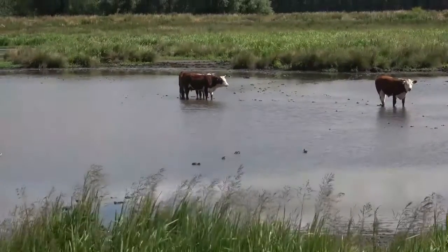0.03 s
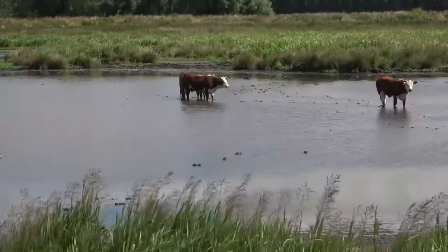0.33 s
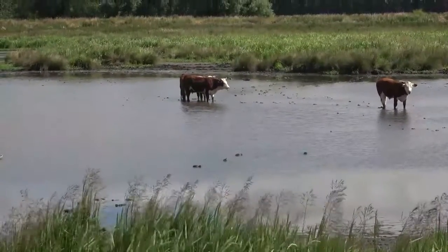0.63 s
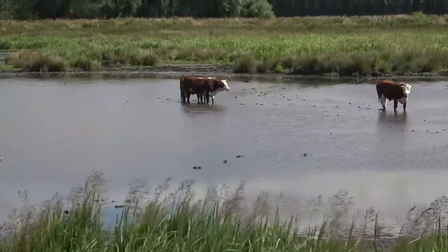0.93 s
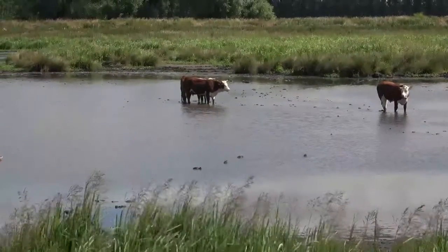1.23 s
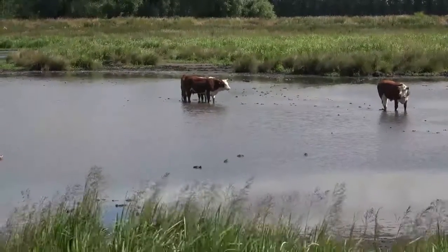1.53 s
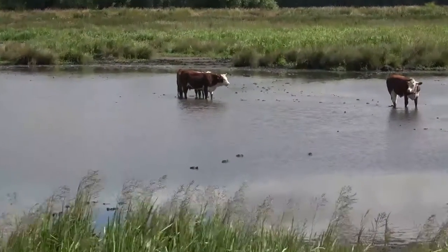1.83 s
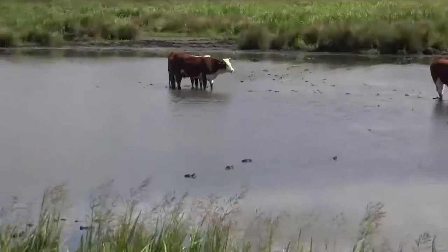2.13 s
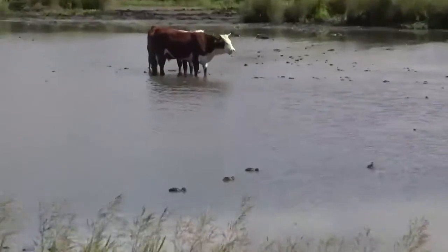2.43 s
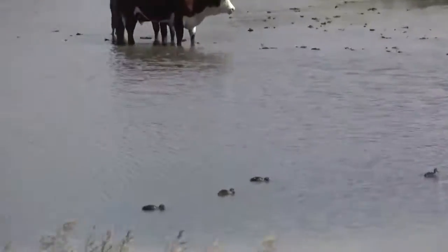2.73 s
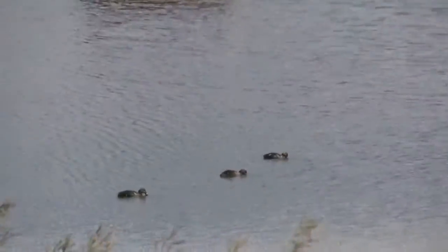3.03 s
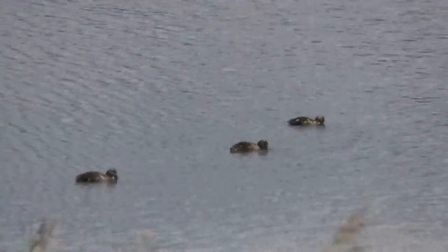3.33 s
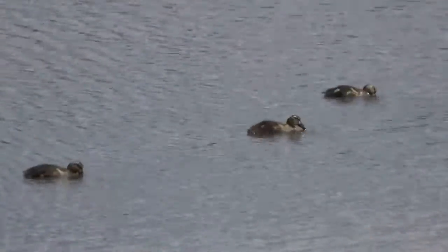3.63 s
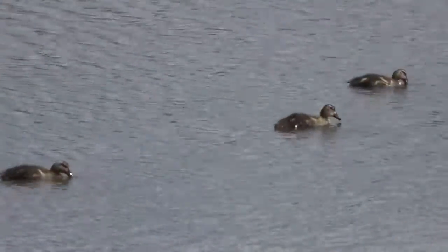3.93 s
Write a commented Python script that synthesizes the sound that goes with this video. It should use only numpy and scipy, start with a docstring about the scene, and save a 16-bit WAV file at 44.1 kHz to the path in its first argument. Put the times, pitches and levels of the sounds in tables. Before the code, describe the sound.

A wading bird starts yelping almost at once, about six high, cracking calls a second, over wind rumbling on the microphone and softly hissing reeds. The calls swell from 0.6 seconds, among faint thin whistles and two distant quacks. Dry wind crackles begin around 1.3 seconds, and gusts hit hardest from 2 seconds. The yelps fade near 3 seconds, pause, and return faintly at about 3.7 seconds.

```python
"""Wind buffets the microphone from the start, and reeds hiss beside a shallow pond. Almost at once a
wading bird begins to yelp, about six times a second: each harmonic call dips, breaks upward and falls
away. The series swells among thin gliding whistles and far-off quacks; then come short dry ticks, many
of them wind crackling on the microphone. From two seconds on the strongest gusts drive its limiter.
The yelps fade near three seconds, pause, and return faintly at the end."""
import sys
import numpy as np
from scipy import signal
from scipy.fft import rfft, irfft, next_fast_len
from scipy.io import wavfile
from scipy.ndimage import uniform_filter1d, minimum_filter1d, map_coordinates

SR = 44100
rng = np.random.default_rng(int(sys.argv[2]) if len(sys.argv) > 2 else 0)


def unload_audio(sound):
    """Save the sound as a 16-bit wav file, at the path given as the first command line argument."""
    columns = np.transpose(np.atleast_2d(sound))
    # keep every value between -1 and 1, then stretch to whole-number steps
    steps = np.round(np.clip(columns, -1, 1) * 32767)
    wavfile.write(sys.argv[1], SR, steps.astype(np.int16))


N = 176400

# Spectra of the microphone's hiss, grass, reeds, wind rumble and eddies: frequency_hz, relative_db
HISS_SPECTRUM = [(7000, -54), (11000, -13), (12700, 2), (14400, -12), (15400, 7), (16000, -13)]
GRASS_SPECTRUM = [(200, -18), (350, -2.5), (550, -3.5), (950, -8.5), (1300, -23.5), (2200, -12),
                  (5000, -38)]
REED_SPECTRUM = [(300, 9), (600, -5), (950, 5), (1220, 4), (1600, 10.5), (1900, -2), (2800, -1), (3500, 1),
                 (4200, 2), (4900, -5.5), (5800, -1.5), (6700, -6.5), (8000, -0.5), (9500, -3), (12000, -4),
                 (16000, -11)]
RUMBLE_SPECTRUM = [(4, -58), (9, -13.5), (16, 6.5), (25, -1.5), (40, -5), (63, -14), (100, -23.5),
                   (160, -34.5), (300, -52), (700, -90)]
EDDY_SPECTRUM = [(50, -0.5), (110, -5.5), (170, -0.5), (250, -5.5), (400, -14), (630, -24.5), (1200, -30.5),
                 (3000, -46)]
# Envelope of the wind in the grass: time_s, level_db
GRASS_LEVELS = [(0, -56.5), (.5, -58.5), (.9, -55), (1.3, -56), (1.8, -55), (2.3, -57), (2.8, -58.5),
                (4, -59.5)]
# Envelopes of the reed hiss, wind rumble and eddies: time_s, relative_db
REED_LEVELS = [(0.03, -60.5), (0.92, -60.5), (1.44, -63.5), (1.86, -61), (2.4, -67.5), (2.77, -64.5),
               (2.92, -66), (3.97, -66)]
RUMBLE_LEVELS = [(0, -14), (.2, -24), (.3, -16), (.68, -16.5), (.78, -15.5), (1.14, -15), (1.2, -11.5),
                 (1.31, -13.5), (1.43, -10.5), (1.55, -15), (1.85, -13), (2.08, -8), (2.22, -11.5),
                 (2.4, -10.5), (2.48, -13), (2.56, -9), (2.62, -17.5), (2.75, -12.5), (2.92, -18),
                 (3.23, -8.5), (3.28, -12.5), (3.33, -7.5), (3.39, -29), (3.62, -13), (3.78, -20.5),
                 (3.9, -14)]
EDDY_LEVELS = [(0, -39.5), (.2, -44.5), (.42, -35), (1.3, -40.5), (1.41, -42), (1.58, -37), (1.7, -40.5),
               (1.8, -36.5), (2.08, -33), (2.46, -39), (2.84, -36), (2.93, -46.5), (3, -32), (3.05, -43),
               (3.24, -32), (3.38, -42), (3.55, -38.5), (3.59, -37), (3.78, -47.5), (3.89, -38), (4, -38.5)]
# Pressure pulses on the microphone: peak_s, peak_db
BUFFETS = [(1.008, -12.5), (1.29, -26), (1.436, -16.5), (2.005, -17.5), (2.045, -22), (2.232, -17),
           (3.242, -13.5), (3.312, -19), (3.328, -14.5), (3.596, -21.5)]
# Short dry ticks near 1 kHz: start_s, level_db, pitch_hz
TICKS = [(1.289, -38.5, 885), (1.379, -37.5, 794), (1.419, -40.5, 1100), (1.577, -45, 890),
         (2.017, -40, 1060), (2.093, -38, 870), (2.231, -41, 980), (2.34, -42, 980), (2.426, -42.5, 1060),
         (2.449, -40.5, 1190), (2.485, -42, 840), (2.762, -41, 950), (3.597, -45, 1200)]
# Partials of a tick: frequency_ratio, relative_db
TICK_PARTIALS = [(.7, 3), (1, 3), (1.35, 0)]
# Thin whistles, one a falling overtone within a yelp: start_s, length_s, start_hz, end_hz, level_db
WHISTLES = [(.168, 0.037, 1045, 770, -52), (.418, 0.036, 2130, 2780, -58), (0.882, 0.031, 950, 1055, -51),
            (1.333, 0.036, 3200, 2910, -49.5), (1.745, 0.053, 895, 774, -55),
            (2.555, 0.11, 4280, 4100, -61), (2.597, 0.2, 3850, 3640, -63)]
# Duck calls: start_s, length_s, pitch_hz, level_db
QUACKS = [(0.636, 0.139, 526, -61.5), (1.733, 0.069, 468, -64)]
# Harmonics of a quack and a squeak, fundamental first: relative_db
QUACK_HARMONICS = [-17, 4.5, -4, 1, 2.5, -10, -15, -6]
SQUEAK_HARMONICS = [0, -6.5, -7]
# The wader's low notes: start_s, lowest_hz, curvature, harmonic_1_db ... harmonic_4_db
LOW_NOTES = [(0.275, 1403, 0.45, -53, -70, -76.5, -75.0), (0.432, 1360, 0.12, -51.5, -58, -64.5, -71.5),
             (0.601, 1377, 0.56, -43.5, -47.5, -54, -58), (0.768, 1360, 0.33, -47, -50.5, -53.5, -55),
             (0.939, 1337, 0.58, -45.5, -46.5, -54, -55), (1.107, 1252, 0.73, -48.5, -48.5, -54.5, -59),
             (1.266, 1229, 0.89, -47.5, -52, -59, -55), (1.437, 1291, 0.3, -47.5, -53, -57, -58.5),
             (1.619, 1307, 0.62, -47, -51.5, -53, -53.5), (1.798, 1352, 0.31, -45, -53.5, -61, -62),
             (1.964, 1328, 0.52, -45.5, -54.5, -62, -57.5), (2.138, 1376, 0.21, -48.5, -56.5, -57, -54),
             (2.302, 1347, 0.27, -49, -60, -64, -62), (2.485, 1353, 0.21, -54.5, -58.0, -64, -62),
             (2.654, 1350, 0.73, -46, -52.5, -57, -58), (2.821, 1320, 0.4, -49.5, -53.5, -56.5, -66),
             (3.012, 1348, 0.65, -55.5, -64, -72, -79.5), (3.195, 1220, 0.97, -53, -66, -66, -81.0),
             (3.765, 1310, 0.59, -53.0, -72.5, -69, -73.0), (3.937, 1332, 0.61, -54.5, -65, -63, -71)]
# Its squeaks before the break: start_s, centre_hz, level_db, overtone_gain_db
SQUEAKS = [(.645, 1700, -47.5, -2), (.813, 1695, -49, 4), (1.149, 1560, -57, 8), (1.311, 1620, -48.5, -8),
           (1.489, 1525, -46, -3), (2.007, 1550, -56, -8), (2.172, 1550, -48.5, -4),
           (2.351, 1594, -48, -12), (2.52, 1515, -46.5, -11), (2.871, 1655, -50.5, -2.5)]
# Its high notes: start_s, top_hz, harmonic_1_db ... harmonic_3_db
HIGH_NOTES = [(0.149, 1610, -54.5, -67.5, -62), (0.323, 1665, -53.5, -67, -63),
              (0.491, 1677, -53, -58, -68.5), (0.658, 1714, -50.0, -53, -64.5),
              (0.828, 1808, -50, -53, -52.5), (0.988, 1857, -50, -47.5, -53),
              (1.161, 1790, -51, -51.0, -54), (1.327, 1832, -49.5, -52.0, -54.5),
              (1.502, 1806, -58, -55, -65), (1.671, 1767, -50, -57, -61), (1.847, 1840, -50, -56.5, -57),
              (2.022, 1795, -58, -59, -67.5), (2.188, 1870, -56, -55.5, -53), (2.364, 1810, -56, -63, -61),
              (2.538, 1846, -54, -51, -54), (2.704, 1807, -50.5, -49.5, -58),
              (2.883, 1810, -58, -56.5, -67.5), (3.067, 1617, -53, -63, -74.0),
              (3.644, 1568, -54.5, -63.5, -81.5), (3.976, 1595, -49.5, -73, -70)]

LOW_JITTER, HIGH_JITTER = .006, .017  # scatter as a share of the pitch
CRACK_JITTER, CRACK_S = .04, .005  # extra scatter at the voice's break, and its time constant


def amp(db):
    """Decibels to amplitude ratio."""
    return 10 ** (np.asarray(db) / 20)


def unit(x):
    """Normalisation to rms 1."""
    return x / np.sqrt(np.mean(x ** 2) + 1e-20)


def curve(rows):
    """Linear interpolation of (time_s, value) rows to every sample."""
    return np.interp(np.arange(N) / SR, *np.transpose(rows))


def wobble(rate, size=N):
    """Smooth random modulation: a spline through rate knots a second."""
    return map_coordinates(rng.standard_normal(4000), [np.arange(size) * rate / SR], mode="wrap")


def noise(spectrum):
    """Spectral shaping of white noise, at rms 1."""
    size = next_fast_len(N + SR // 4)
    hz, db = np.transpose(spectrum)
    gain = amp(np.interp(np.log(np.fft.rfftfreq(size, 1 / SR) + 1), np.log(hz + 1), db))
    return unit(irfft(rfft(rng.standard_normal(size)) * gain, size)[:N])


def even(x, window_s=.07):
    """Division by the running rms removes a noise's own slow swells."""
    size = int(window_s * SR)
    power = uniform_filter1d(uniform_filter1d(x ** 2, size), size)
    return unit(x / np.sqrt(np.abs(power) + 1e-9))


def add(track, start_s, sound):
    """Superposition of a sound on a track."""
    part = track[max(round(start_s * SR), 0):][:len(sound)]
    part += sound[:len(part)]


def voice(hz, harmonics_db, jitter, edge_s=.0047, shimmer_db=1.6, knot_rate=380):
    """A harmonic series roughened by jitter (random pitch) and shimmer (random amplitude)."""
    n = len(hz)
    t = np.arange(n) / SR
    phase = 2 * np.pi * np.cumsum(hz * (1 + jitter * wobble(knot_rate, n))) / SR
    phase += .07 * wobble(1100, n)  # phase noise: hoarser in the higher harmonics
    edges = np.sin(np.pi / 2 * np.clip(np.minimum(t, t[-1] - t) / edge_s, 0, 1))
    shimmer = unit(amp(shimmer_db * wobble(knot_rate, n)))
    tone = sum(amp(db) * unit(amp(shimmer_db * wobble(knot_rate, n))) * np.sin(k * phase)
               for k, db in enumerate(harmonics_db, 1))
    return np.sqrt(2) * edges * shimmer * tone


def microphone_hiss():
    """The noise floor: faint treble noise whose level wavers."""
    return amp(-62 + 2.5 * wobble(9.13)) * noise(HISS_SPECTRUM)


def reeds_and_grass():
    """Flow noise: air hisses in the reeds and rushes at lower frequencies through the grass."""
    reeds = amp(curve(REED_LEVELS) + 10 + .8 * wobble(12)) * noise(REED_SPECTRUM)
    grass = amp(curve(GRASS_LEVELS) + 2 * wobble(24.78)) * noise(GRASS_SPECTRUM)
    return reeds + grass


def dry_ticks(rise_s=.00018, t60_s=.018):
    """Damped transients of three partials each, many of them wind crackling on the microphone."""
    out, t = np.zeros(N), np.arange(SR // 30) / SR
    envelope = (1 - np.exp(-t / rise_s)) * amp(-60 * t / t60_s)
    for start_s, db, hz in TICKS:
        for ratio, partial_db in TICK_PARTIALS:
            gain = amp(db + partial_db + rng.normal(0, 1.5))
            partial_hz = hz * ratio * np.exp(rng.normal(0, .05))
            add(out, start_s, gain * envelope * np.sin(2 * np.pi * (partial_hz * t + rng.random())))
    return out


def wind(rise_s=.0018):
    """Turbulent pressure on the microphone: deep rumble, fluttering eddies and single sharp pulses."""
    rumble = amp(curve(RUMBLE_LEVELS) + 4) * even(noise(RUMBLE_SPECTRUM))
    flutter = unit(amp(3 * wobble(45)) * even(noise(EDDY_SPECTRUM)))
    eddies = amp(curve(EDDY_LEVELS) - 1.5) * flutter
    pulses, u = np.zeros(N), np.arange(SR // 20) / SR / rise_s
    for peak_s, db in BUFFETS:
        add(pulses, peak_s - rise_s, amp(db) * u ** 2 * np.exp(2 - 2 * u))
    return rumble + eddies + pulses


def bank_echo(x, t60_s=.38, echo_db=-12.5):
    """Reverberation: scatter from the banks adds an exponentially decaying tail."""
    t = np.arange(SR // 2) / SR
    tail = rng.standard_normal(len(t)) * amp(-60 * t / t60_s) * (1 - np.exp(-t / .0021))
    return x + amp(echo_db) * signal.fftconvolve(x, tail / np.linalg.norm(tail))[:N]


def whistles_and_quacks(rasp_hz=53.2, rasp_db=11):
    """Whistles are single gliding partials; amplitude modulation gives the quacks their rasp."""
    out = np.zeros(N)
    for start_s, length_s, start_hz, end_hz, db in WHISTLES:
        n = int(length_s * SR)
        whistle = voice(np.linspace(start_hz, end_hz, n), [0], jitter=.014)
        add(out, start_s, amp(db) * signal.windows.tukey(n) * whistle)
    for start_s, length_s, hz, db in QUACKS:
        t = np.arange(int(length_s * SR)) / SR
        rasp = unit(amp(rasp_db * np.sin(2 * np.pi * rasp_hz * t)))
        add(out, start_s, amp(db) * rasp * voice(np.full(len(t), hz), QUACK_HARMONICS, jitter=.04))
    return out


def wader_low_notes(length_s=.042, lowest_at=.54, recovery=.55, onset_dull_db=-5):
    """Frequency modulation along a U opens the yelp; jitter grows as the voice nears its break."""
    out, u = np.zeros(N), np.linspace(0, 1, int(length_s * SR))
    jitter = LOW_JITTER + CRACK_JITTER * np.exp((u - 1) * length_s / CRACK_S)
    scoop = (u - lowest_at) ** 2 * np.where(u < lowest_at, 1, recovery)
    for start_s, hz, curvature, *harmonics in LOW_NOTES:
        levels = [db + k * onset_dull_db * (1 - u) ** 6 for k, db in enumerate(harmonics)]
        add(out, start_s, voice(hz * (1 + curvature * scoop), levels, jitter))
    return out


def wader_squeaks(length_s=.0145, climb=.095):
    """A brief linear upward glide precedes the break in some calls."""
    out, u = np.zeros(N), np.linspace(0, 1, int(length_s * SR))
    for start_s, hz, db, overtone_db in SQUEAKS:
        levels = [db + level + overtone_db * (k > 0) for k, level in enumerate(SQUEAK_HARMONICS)]
        add(out, start_s, voice(hz * (1 + climb * (u - .5)), levels, HIGH_JITTER))
    return out


def wader_high_notes(length_s=.037, sag=.0655, fall=.174, fade_db=-3, dull_db=-7, quaver_rate=130):
    """A register break: the voice cracks upward, quavers and falls, its upper harmonics fading first."""
    out, u = np.zeros(N), np.linspace(0, 1, int(length_s * SR))
    jitter = HIGH_JITTER + CRACK_JITTER * np.exp(-u * length_s / CRACK_S)
    for start_s, hz, *harmonics in HIGH_NOTES:
        glide = 1 - sag * u - fall * u ** 3 + .016 * wobble(quaver_rate, len(u))
        levels = [db + (fade_db + k * dull_db) * u ** 2 + 2.5 * wobble(quaver_rate, len(u))
                  for k, db in enumerate(harmonics)]
        add(out, start_s, voice(hz * glide, levels, jitter))
    return out


def scene():
    """Superposition in one channel: reverberant birds, with reeds and wind close by."""
    hiss = microphone_hiss()
    wader = wader_low_notes() + wader_squeaks() + wader_high_notes()
    birds = bank_echo(wader + whistles_and_quacks())
    return (birds + reeds_and_grass() + dry_ticks() + wind() + hiss)[None]


def record(dry, ceiling=1, hold_s=.012, top_hz=15800):
    """Peak limiting lowers the gain in gusts; a steep low-pass filter then bounds the bandwidth."""
    size = int(hold_s * SR) + 1
    gain = minimum_filter1d(np.minimum(1, ceiling / (np.abs(dry) + 1e-9)), 2 * size)
    limited = dry * uniform_filter1d(uniform_filter1d(gain, size), size)
    return signal.sosfiltfilt(signal.ellip(10, .05, 60, top_hz, fs=SR, output="sos"), limited)


dry = scene()
out = record(dry)
unload_audio(out)
```